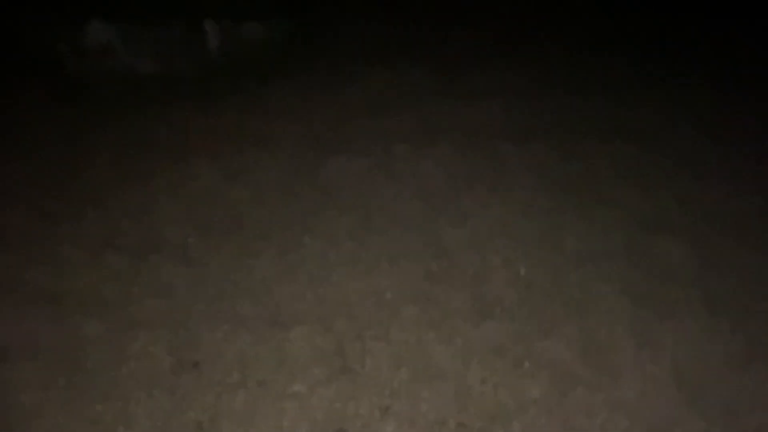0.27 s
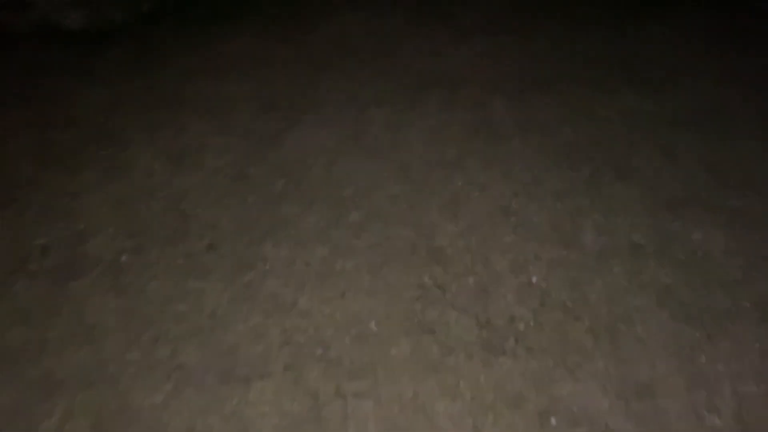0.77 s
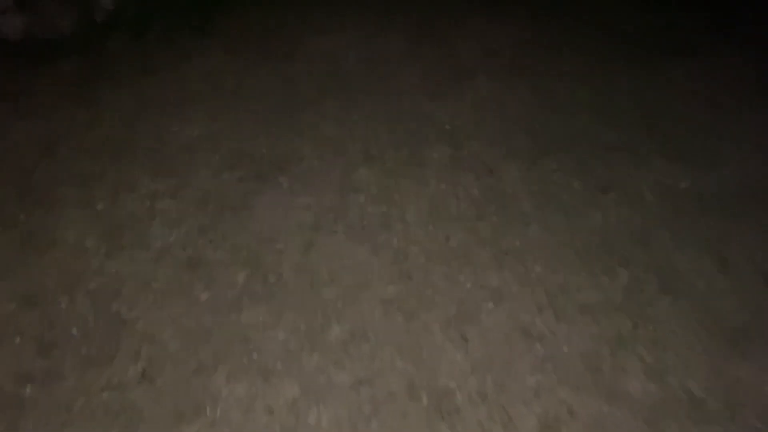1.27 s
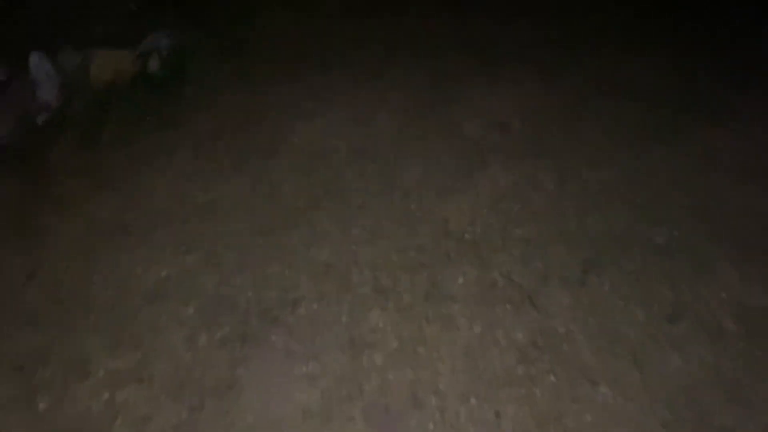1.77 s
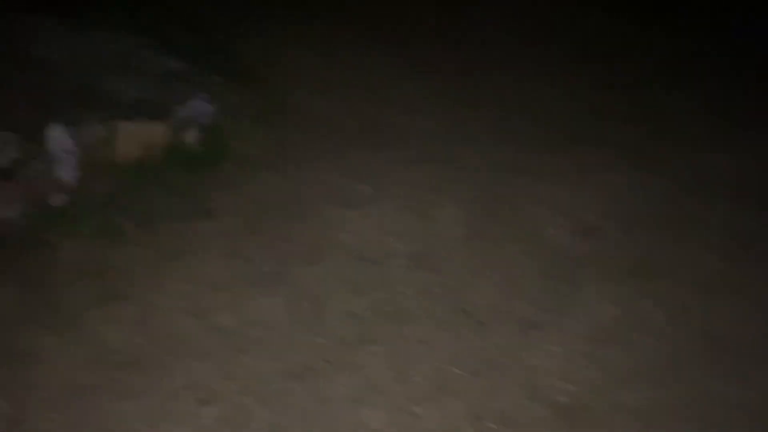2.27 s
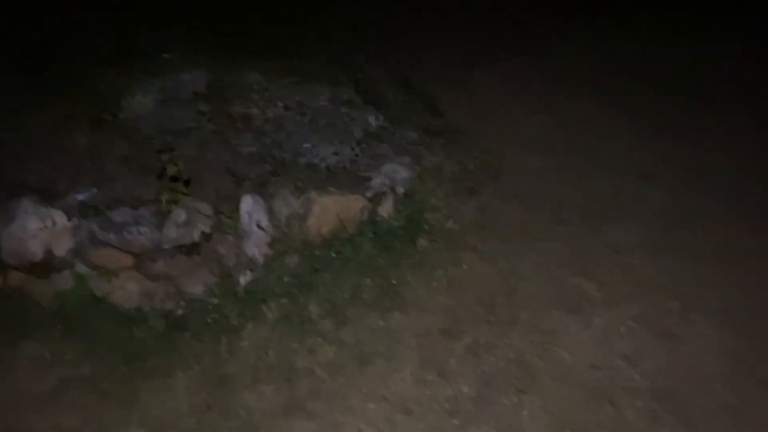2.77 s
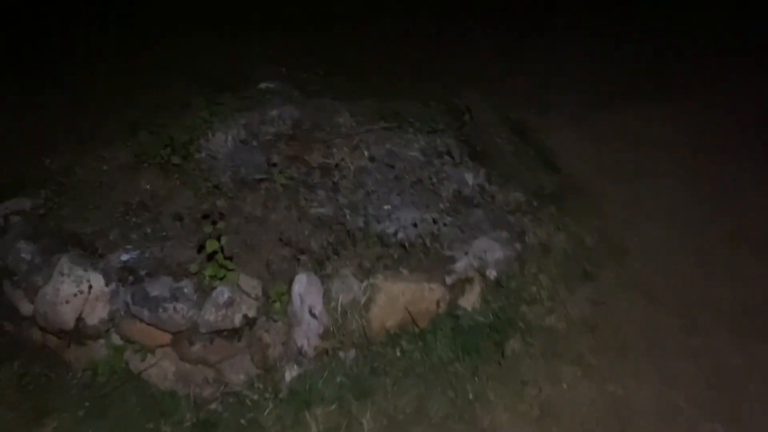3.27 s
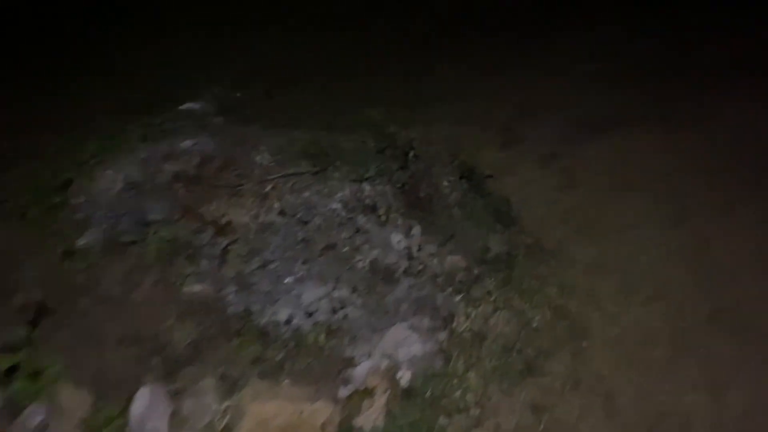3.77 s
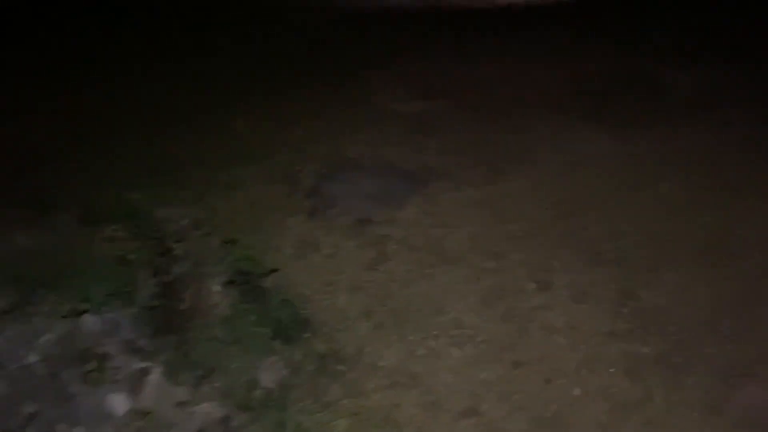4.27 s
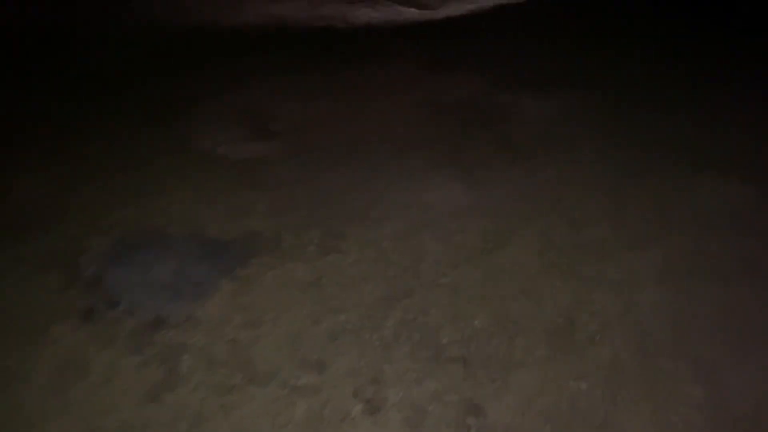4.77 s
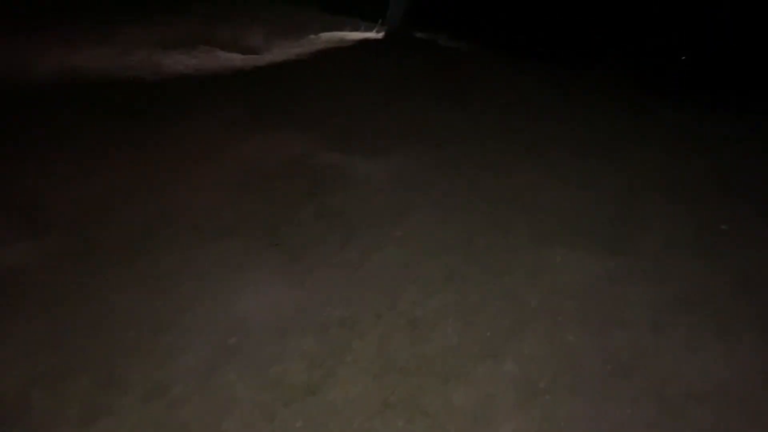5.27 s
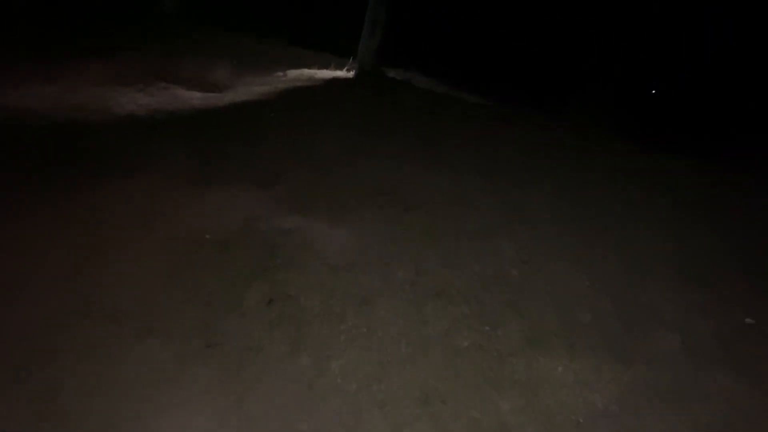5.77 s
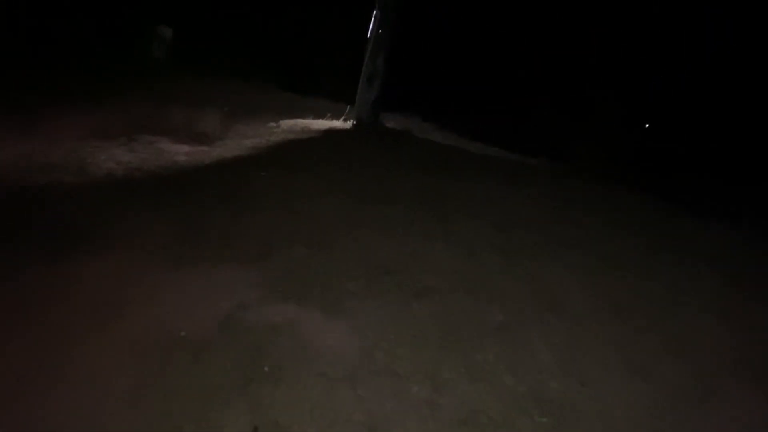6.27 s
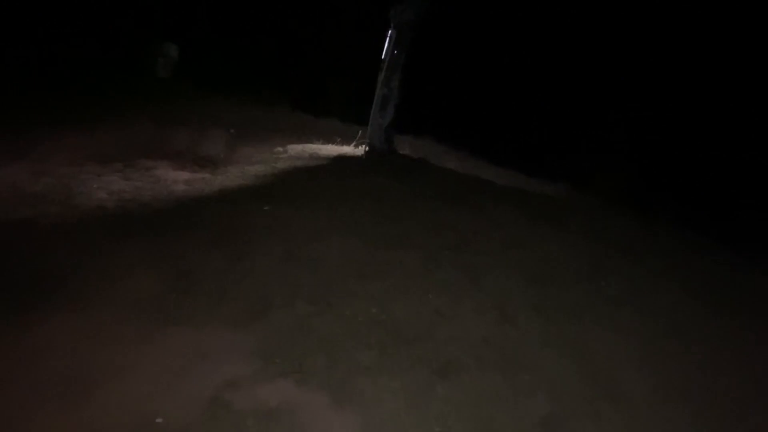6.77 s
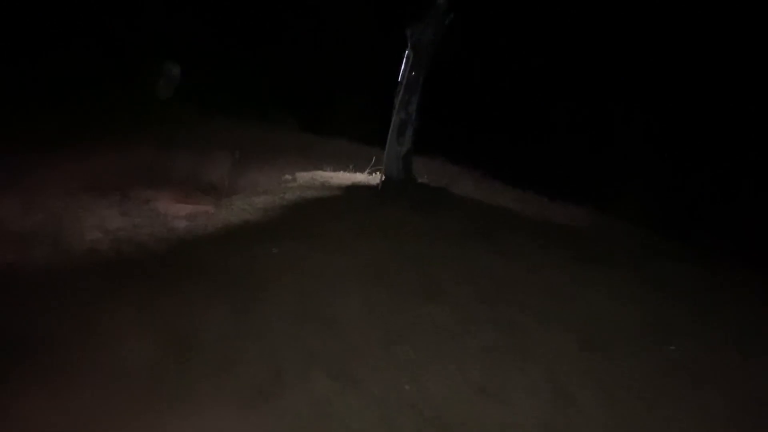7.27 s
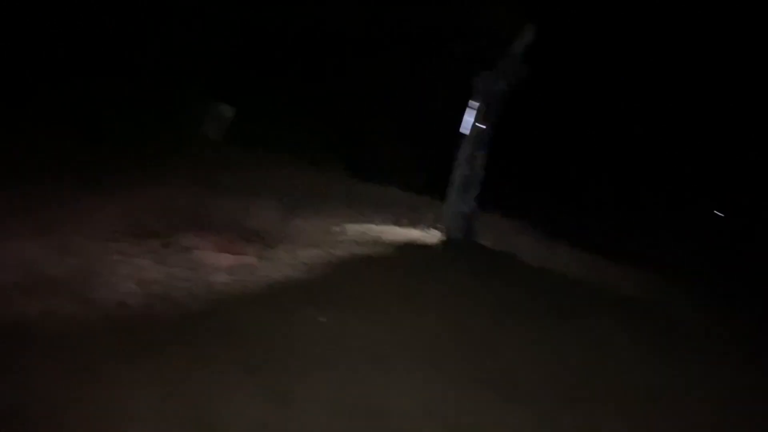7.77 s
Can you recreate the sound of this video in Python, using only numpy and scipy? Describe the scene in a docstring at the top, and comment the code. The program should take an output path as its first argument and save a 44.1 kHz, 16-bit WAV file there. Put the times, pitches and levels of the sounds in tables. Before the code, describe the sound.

Outdoors at night, quiet footsteps crunch and scuff over dry grass and earth, with irregular sandal slaps. Over them a nearby bush-cricket keeps up a rapid, shrill chirping that gets closer and clearer as the walk goes on, against a faint hiss of far insects. Light knocks and a low rumble come from the hand-held microphone, and one heavier bump lands a little after halfway.

```python
"""A bush-cricket chirps about eight times a second, heard on a walk across a campsite at night.
Each chirp is a long and a short stroke of its wing file, whose teeth set the wing ringing; ground and
trees scatter the song. Sandals crunch on dry grass and soil and pop against the heel. The hand-held
microphone rumbles and takes one heavy bump among lighter ones. Far insects and still air lie behind."""
import sys
import numpy as np
from scipy import signal
from scipy.fft import rfft, irfft, next_fast_len
from scipy.io import wavfile
from scipy.ndimage import map_coordinates

SR = 44100
rng = np.random.default_rng(int(sys.argv[2]) if len(sys.argv) > 2 else 0)


def put_to_file(sound):
    """Save the sound as 16-bit audio at rate SR, in the file named by the first command-line argument."""
    columns = np.atleast_2d(sound).T  # one column per channel
    safe = np.clip(columns, -1, 1)
    whole_steps = np.round(safe * 32767)
    wavfile.write(sys.argv[1], SR, whole_steps.astype(np.int16))


N = 353505
TIME = np.arange(N) / SR


# The song's arc. Each row: time in seconds, long stroke in dB, short stroke in dB, wing pitch in Hz.
SONG = [(0, -35.5, -42, 6910), (.85, -34.5, -39.5, 6740), (1.2, -32, -39.5, 6990), (1.45, -28.5, -43, 6920),
        (1.8, -29, -34, 6700), (2.3, -29, -31.5, 7000), (2.9, -29, -36, 6870), (3.2, -31.5, -42, 6680),
        (3.7, -34.5, -39, 6710), (4.15, -30, -35, 6860), (4.6, -29.5, -30.5, 7120),
        (5.2, -26.5, -28.5, 6976), (5.6, -25, -27.5, 7030), (6.05, -24, -25, 6910),
        (6.55, -23, -22.5, 7280), (7.15, -24.5, -27.5, 6970), (7.7, -25, -24.5, 7080),
        (8, -28, -29.5, 6940)]
# The insect drags and hurries. Each row: time in seconds, lag behind the beat in seconds.
DRAG = [(0, .002), (1.3, 0), (1.7, -.004), (2.5, -.004), (3, .001), (4.35, .001), (4.6, .007), (5.2, .003),
        (6.6, .0015), (8, -.005)]
# Perspective along the walk. Each row: time in seconds, then trims in dB for the echoes,
# the rasp and overtone, and the wing's side resonances.
PERSPECTIVE = [(0, 10, 8.5, 8), (1.2, 2.5, 1, -4), (2.2, -3, 2.5, -1), (3.5, -3, 1, -3.5),
               (4.6, -3.5, 0.5, 3), (5.3, -4, 0.5, 3), (6.3, -10, -5, 6), (7, -7.5, -4, 3.5),
               (8, -6.5, 0.5, 5)]
# The long, raspy stroke. Each row: seconds from the chirp's peak, envelope in dB, usual pitch in Hz,
# upper resonance in dB, rasp in dB.
LONG_STROKE = [(-.051, -38, 5660, 19, -6), (-.046, -13.5, 5920, -2.5, -8), (-.042, -23, 6020, 0.5, -22),
               (-.036, -19, 6300, 11.5, 5), (-.03, -5.5, 6500, -4, -6), (-.022, -0.5, 6930, -6.5, -8),
               (-.0162, -0.5, 7450, -25, -11.5), (-.0143, -13, 7740, 8, -7), (-.010, -15.5, 7750, -22, 12),
               (-.007, -41, 7620, 0, 14)]
# The short, purer stroke. Each row: seconds from the chirp's peak, envelope in dB, pitch in Hz, rasp in dB.
SHORT_STROKE = [(-.0098, -33, 6770, 10), (-.0078, -5.5, 7170, -5.5), (-.006, -17, 6707, 17),
                (-.004, -9.5, 6980, 5.5), (-.0018, 2.5, 7547, -22.5), (.0008, 2, 7820, -15.5),
                (.0034, -21.5, 7810, 12), (.007, -76, 7995, -24)]
# Colour of the tooth clicks. Each row: frequency in Hz, gain in dB.
RASP_EQ = [(3000, -15), (5000, -12), (6500, 6.5), (8800, 2), (10000, 0.5), (11100, 2.5), (12200, -2),
           (13200, 0), (14200, -3.5), (15100, -0.5), (17000, 4.5)]

def bush_cricket(first_s=.095, period_s=.11956, usual_wing_hz=6965, scatter_db=.6):
    """The scraper crosses the wing file twice a chirp, rising in pitch: a long stroke, then a short one."""
    beats = np.arange(first_s, N / SR, period_s)
    peaks = beats + columns_at(DRAG, beats)[0]
    chirp = np.searchsorted((peaks[1:] + peaks[:-1]) / 2, TIME)   # index of the nearest chirp
    long_db, short_db, wing_hz = columns_at(SONG, peaks[chirp])
    quirks = rng.standard_normal((len(peaks), 6))   # no two chirps are quite alike
    pace, tuning, colour, tension, long_force, short_force = quirks[chirp].T
    since_peak = (TIME - peaks[chirp]) * np.exp(.03 * pace)
    _, bright_db, sides_db = columns_at(PERSPECTIVE)
    teeth = file_teeth(per_s=760, jitter=.25, uneven_db=2)
    clicks = teeth * rng.choice([-1, 1], N) + .12 * rng.standard_normal(N)
    rasp = from_db(bright_db) * coloured(clicks, RASP_EQ)

    shape_db, glide_hz, upper_db, rasp_db = columns_at(LONG_STROKE, since_peak)
    main_hz = glide_hz * wing_hz / usual_wing_hz * np.exp(.012 * tension)
    main = wing(teeth, main_hz, ring_s=.001, locked=.66)
    lower = wing(teeth, .7 * main_hz, ring_s=.0006, locked=.5)
    upper = wing(teeth, 8100 * np.exp(.01 * tuning), ring_s=.00044, locked=.11)   # does not glide
    sides = from_db(-18.5) * lower + from_db(upper_db + 2.44 * colour) * upper
    envelope = from_db(long_db + scatter_db * long_force + shape_db - 5)
    long = envelope * (main + from_db(sides_db) * sides + from_db(rasp_db) * rasp)

    shape_db, glide_hz, rasp_db = columns_at(SHORT_STROKE, since_peak)
    pitch_hz = glide_hz * np.exp(.011 * tuning)
    tone = wing(teeth, pitch_hz, ring_s=.00048, locked=.89)
    overtone = from_db(bright_db - 18) * wing(teeth, 2 * pitch_hz, ring_s=.0005, locked=.4)
    envelope = from_db(short_db + scatter_db * short_force + shape_db)
    short = envelope * (tone + overtone + from_db(rasp_db) * rasp)
    return long + short


def file_teeth(per_s, jitter, uneven_db, count=16000):
    """The scraper catches tooth after tooth, at a slightly uneven pace and force."""
    gaps_s = np.exp(jitter * rng.standard_normal(count)) / per_s
    at = (np.cumsum(gaps_s) * SR).astype(int)
    force = from_db(uneven_db * rng.standard_normal(count))
    return np.bincount(at[at < N], force[at < N], N)


def wing(teeth, pitch_hz, ring_s, locked):
    """Teeth set the wing ringing; the share that is locked in step gives a pure tone."""
    kicks = teeth * np.exp(2j * np.pi * rng.random(N))
    ringing = signal.lfilter([1], [1, -np.exp(-1 / (ring_s * SR))], kicks)
    ringing = rms_one(signal.lfilter(*signal.butter(2, 1500, fs=SR), ringing))   # swells over a few cycles
    swing = np.sqrt(locked) + np.sqrt(1 - locked) * ringing
    return np.sqrt(2) * np.real(swing * np.exp(2j * np.pi * np.cumsum(pitch_hz) / SR))


def ground_bounce(x, far_s, near_s, bounce_db):
    """The ground returns the song a little later; the lag shrinks as the walker goes by."""
    lag = np.linspace(far_s, near_s, N)
    late = map_coordinates(x, [(TIME - lag) * SR], order=3)
    return (x + from_db(bounce_db) * late) / np.hypot(1, from_db(bounce_db))


def among_trees(song):
    """Leaves add a tight tail and trunks a longer one; the blend gets drier along the walk."""
    echo_db = columns_at(PERSPECTIVE)[0]
    leaves = from_db(-4) * tree_echoes(song, t60=.073, side_db=-9.5, dull_hz=18900)
    trunks = tree_echoes(song, t60=.19, side_db=-15.5, dull_hz=15200)
    return (song + from_db(echo_db) * (leaves + trunks)) / np.hypot(1, from_db(echo_db - 1.5))


def tree_echoes(x, t60, side_db, dull_hz, change_s=.23912):
    """Many small reflections, different on each side and changing as the walker moves on."""
    t, hop = TIME[:SR // 2], int(change_s * SR)
    decay = from_db(-60 * t / t60) * (t > .002)
    out = np.zeros((2, N + SR))
    for first in range(0, N, hop):
        echoes = rng.standard_normal((2, len(t))) * (rng.random((2, len(t))) < .08) * decay
        echoes /= np.linalg.norm(echoes, axis=1, keepdims=True)
        tail = signal.fftconvolve(x[None, first:first + hop], echoes, axes=1)
        out[:, first:first + tail.shape[1]] += tail
    mid, side = out[:, :N]
    stereo = mid + from_db(side_db) * side * [[1], [-1]]
    return filtered(stereo, lambda hz: 1 / np.sqrt(1 + (hz / dull_hz) ** 4))


# Footfalls. Each row: landing in seconds, grass crunch in dB, its decay in seconds, heel on soil in dB,
# sole roll in dB, seconds until toe-off, hand sway in dB.
STEPS = [(.195, -50.5, 0.19, -59, -54, 0.36, -51.5), (.8, -49.5, 0.055, -63, -53, 0.31, -54.5),
         (1.368, -46.5, 0.046, -55, -52.5, 0.26, -50.5), (1.95, -50, 0.074, -72, -55, 0.28, -51),
         (2.475, -54.5, 0.076, -56.5, -55, 0.27, -51), (3.113, -51, 0.021, -57, -52.5, 0.38, -52),
         (3.766, -47, 0.045, -54, -54, 0.37, -47.5), (4.245, -51, 0.033, -67, -53.5, 0.27, -48.5),
         (4.87, -50, 0.082, -52, -54.5, 0.23, -47.5), (5.397, -45, 0.018, -45.5, -52, 0.16, -47),
         (5.94, -49.5, 0.097, -51.5, -57, 0.39, -50.5), (6.485, -53.5, 0.073, -62, -53.5, 0.26, -56),
         (7.164, -51, .03, -67, -55, 0.17, -49.5), (7.735, -44.5, 0.041, -48, -58.5, 0.19, -49)]
# The swinging foot brushes the ground. Each row: peak time in seconds, grass in dB, soil in dB.
SCUFFS = [(.09, -55, -68), (.675, -51.5, -60), (0.984, -48, -51), (1.83, -50.5, -72), (2.13, -57, -56),
          (2.56, -54, -66), (2.95, -54.5, -56), (3.732, -46, -51), (5.227, -53.5, -50), (6.179, -73, -60),
          (6.66, -55, -58), (7.619, -61, -53)]
# Dry stalks breaking. Each row: start in seconds, level in dB.
SNAPS = [(.193, -32), (.497, -48), (1.356, -43), (1.362, -27), (1.66, -50), (1.947, -40), (2.017, -32),
         (2.474, -33), (2.490, -41), (2.561, -41), (3.762, -36), (4.242, -34), (5.389, -39), (6.481, -39),
         (7.721, -33.5)]
# Dull soil and crisp grass. Each row: frequency in Hz, gain in dB.
SOIL_EQ = [(80, -35), (160, 4.5), (350, 1.5), (700, 1.5), (1200, -4), (2500, -36)]
GRASS_EQ = [(300, -11), (700, -3.5), (1200, 2.5), (1800, 2.5), (2400, 1), (3200, -3), (5000, -6.5),
            (9000, -16.5), (15000, -10)]

def footsteps(heel_rise_s=.023, heel_fall_s=.09, snap_s=.0011):
    """The heel crunches down and the sole grinds the soil; the other foot scuffs past and stalks snap."""
    on_soil, on_grass = [], []
    for lands, crunch_db, crunch_s, heel_db, roll_db, roll_s, _ in STEPS:
        contact = np.clip((TIME - lands) / heel_rise_s, 0, 1)
        roll = from_db(roll_db) * contact * surge(lands + roll_s, rise_s=1, fall_s=.078)
        on_soil += [from_db(heel_db) * surge(lands, heel_rise_s, heel_fall_s), roll]
        on_grass += [from_db(crunch_db) * surge(lands, heel_rise_s, crunch_s), from_db(-6) * roll]
    for at, grass_db, soil_db in SCUFFS:
        scuff = surge(at, rise_s=.043, fall_s=.048)
        on_soil.append(from_db(soil_db) * scuff)
        on_grass.append(from_db(grass_db) * scuff)
    soil = power_sum(on_soil) * diffuse(grains(per_s=1500, spread_db=5.5), SOIL_EQ)
    blades = grains(per_s=1600, spread_db=3.8)
    grit = from_db(-11.5) * grains(per_s=76, spread_db=2)
    grass = from_db(5) * power_sum(on_grass) * diffuse(blades + grit, GRASS_EQ)
    cracks = sum(from_db(db) * (TIME >= s) * np.exp(-np.abs(TIME - s) / snap_s) for s, db in SNAPS)
    stalks = cracks * diffuse(noise(), GRASS_EQ)
    return panned(soil, 8.5) + panned(grass + stalks, -.49)


# Sandal slaps. Each row: start in seconds, level in dB, starting pitch in Hz, left over right in dB.
SANDAL_POPS = [(0.68, -33, 1040, 4), (1.063, -27, 1250, 3), (1.107, -38, 910, 5), (1.768, -27.5, 1770, -6),
               (2.23, -38.5, 1105, 5), (2.306, -37, 954, 6), (3.366, -32.5, 1014, -1),
               (3.403, -37, 1112, -3), (3.423, -29, 1010, -2.5), (4.016, -31.5, 1720, -9),
               (4.556, -22.5, 1200, 0), (5.006, -40, 1475, -2), (5.234, -31.5, 1700, -6),
               (5.664, -29.5, 1042, 4), (6.252, -34, 1804, 0), (6.825, -23, 1190, 4),
               (7.283, -32.5, 1090, 1), (7.916, -41.5, 1120, 6)]

def sandals(echo_s=.004824, echo_db=-14.5):
    """The sole pops against the heel, with a faint early echo and a short tail from the trees."""
    pops = sum(panned(pop(s, db, hz, cycles=1.16), pan) for s, db, hz, pan in SANDAL_POPS)
    echo = from_db(echo_db) * np.roll(pops, int(echo_s * SR), axis=1)
    tail = from_db(-11) * tree_echoes(pops.mean(0), t60=.11, side_db=-3, dull_hz=2500)
    return pops + echo + tail


def pop(start, peak_db, start_hz, cycles, sink=.49):
    """A damped blow of a few cycles, whose pitch sinks as the contact relaxes."""
    out, first = np.zeros(N + SR), int(start * SR)
    age = TIME[:SR // 3] * start_hz / cycles   # 1 at the loudest moment
    phase = 2 * np.pi * cycles * np.log1p(sink * age) / sink
    envelope = from_db(peak_db) * (age * np.exp(1 - age)) ** 1.07
    out[first:first + len(age)] = envelope * np.sin(phase)
    return out[:N]


# Thumps on the microphone. Each row: start in seconds, level in dB, starting pitch in Hz.
BUMPS = [(.325, -41, 80), (2.591, -35, 89), (3.445, -34.5, 86.5), (3.73, -35, 90.2), (3.765, -35, 83),
         (3.939, -32.5, 74.3), (4.031, -37, 81.5), (4.269, -34.5, 80), (4.9614, -17, 119.4),
         (5.456, -29.5, 84.8), (7.755, -37, 85.8)]
# Low rumble of the hand. Each row: frequency in Hz, gain in dB.
RUMBLE_EQ = [(20, -20), (35, -15.5), (55, -4), (85, -6), (130, -12), (220, -24), (400, -30)]

def handling(sway_after_s=.14, sway_width_s=.18, still_db=-61.5):
    """The hand shakes the microphone after each footfall and knocks it now and then."""
    sways = [from_db(db) * swell(s + sway_after_s, sway_width_s) for s, *_, db in STEPS]
    rumble = from_db(.5) * power_sum([*sways, from_db(still_db)]) * diffuse(noise(), RUMBLE_EQ)
    bumps = sum(pop(s, db, hz, cycles=1.28) for s, db, hz in BUMPS)
    return rumble + bumps


# Colour of the far insects. Each row: frequency in Hz, gain in dB.
CHORUS_EQ = [(4500, -11), (5500, -5), (6100, 1), (6600, 6.5), (7400, 8), (8200, -4.5), (9500, -7.5),
             (12000, -8.5), (16000, -6)]
# Their slow rise and fall. Each row: time in seconds, level in dB.
CHORUS_LEVEL = [(0, -49.5), (1.7, -47.5), (3.5, -50.5), (5, -48.5), (6.5, -48), (8, -46.5)]

def far_chorus():
    """Many distant insects blur into one high hiss."""
    return from_db(columns_at(CHORUS_LEVEL)[0]) * diffuse(noise(), CHORUS_EQ)


# Colour of the night air. Each row: frequency in Hz, gain in dB.
AIR_EQ = [(15, -36), (25, -26.5), (54, 5), (81, 0.5), (256, -8), (1610, -16), (2300, -9), (2690, -17),
          (3430, -17.5), (4480, -14), (5000, -17), (6500, -26), (11000, -120)]

def night_air(level_db=-52.5):
    """Still air lays a soft, dark bed under everything."""
    return from_db(level_db) * diffuse(noise(), AIR_EQ)


# Stereo width of diffuse sound. Each row: frequency in Hz, left-right correlation.
LIKENESS = [(40, 0.75), (120, 0.92), (300, 0.79), (1200, 0.76), (2500, 0.47), (5000, 0.19), (7000, 0.7),
            (15000, 1)]

def diffuse(pair, spectrum):
    """Two unrelated signals become a coloured stereo field whose width varies with frequency."""
    mid = filtered(pair[0], lambda hz: np.sqrt(1 + at_hz(LIKENESS, hz)))
    side = filtered(pair[1], lambda hz: np.sqrt(1 - at_hz(LIKENESS, hz)))
    return coloured(np.array([mid + side, mid - side]), spectrum)


def coloured(x, spectrum):
    """Apply an EQ curve that rolls off beyond its ends; rms 1."""
    low, high = spectrum[0][0], spectrum[-1][0]
    def response(hz):
        return from_db(at_hz(spectrum, hz)) * np.minimum(hz / low, 1) ** 2 / np.maximum(hz / high, 1) ** 2
    return rms_one(filtered(x, response))


def filtered(x, response):
    """Apply a frequency response, given as a function of Hz."""
    size = next_fast_len(N + SR // 4)
    hz = np.arange(size // 2 + 1) * SR / size
    return irfft(rfft(x, size) * response(hz), size)[..., :N]


def noise():
    """Two unrelated white noises."""
    return rng.standard_normal((2, N))


def grains(per_s, spread_db):
    """Two streams of random clicks of uneven size."""
    sizes = from_db(spread_db * np.minimum(rng.exponential(1, (2, N)), 4))
    hits = rng.random((2, N)) < per_s / SR
    return rms_one(hits * sizes * rng.choice([-1, 1], (2, N)))


def surge(at, rise_s, fall_s):
    """An envelope that grows to 1 at a moment and dies away."""
    return np.exp(-np.maximum((at - TIME) / rise_s, (TIME - at) / fall_s))


def swell(at, width_s):
    """A rounded envelope, 1 at its middle."""
    return np.exp(-.5 * ((TIME - at) / width_s) ** 2)


def power_sum(envelopes):
    """Unrelated sounds add in power."""
    return np.sqrt(sum(e ** 2 for e in envelopes))


def panned(x, balance_db):
    """Place a sound; a positive balance leans left."""
    return x * from_db(np.array([[balance_db], [-balance_db]]) / 2)


def columns_at(rows, t=TIME):
    """Each column of a curve, joined by straight lines."""
    s, *columns = np.transpose(rows)
    return [np.interp(t, s, c) for c in columns]


def at_hz(points, hz):
    """Read a spectrum on a log-frequency axis."""
    f, value = np.transpose(points)
    return np.interp(np.log(hz + 1), np.log(f), value)


def from_db(db):
    """Decibels to gain."""
    return 10 ** (np.asarray(db) / 20)


def rms_one(x):
    """Scale to rms 1."""
    return x / np.sqrt(np.mean(np.abs(x) ** 2) + 1e-20)


def scene():
    """The near insect with its echoes, the far chorus, the air and the walker."""
    song = ground_bounce(bush_cricket(), far_s=.002, near_s=.001244, bounce_db=-9)
    cricket = panned(among_trees(song), 1.14)
    return cricket + far_chorus() + night_air() + footsteps() + sandals() + handling()


# Phase between the two microphone ports. Each row: frequency in Hz, the left's lead in half turns.
PORT_PHASE = [(0, 0), (4700, -.2), (5900, .25), (6500, -.08), (7200, .06), (7700, .3), (8300, .66),
              (8800, 1), (9650, 1), (10000, 1.8), (10400, 2), (11700, 2), (12700, 3), (13700, 3),
              (14800, 4)]

def record(dry, low_cut_hz=24, high_cut_hz=15800):
    """The microphone loses the deepest bass and the very top; its ports drift in phase in the treble."""
    thinned = signal.sosfilt(signal.butter(2, low_cut_hz, "high", fs=SR, output="sos"), dry)
    lead = lambda hz: np.pi * columns_at(PORT_PHASE, hz)[0]
    ports = filtered(thinned, lambda hz: np.exp(.5j * lead(hz) * np.array([[1], [-1]])))
    return filtered(ports, lambda hz: np.clip((high_cut_hz - hz) / 200 + .5, 0, 1))


dry = scene()
out = record(dry)
put_to_file(out)
```